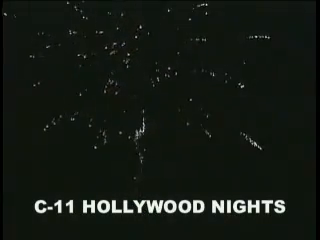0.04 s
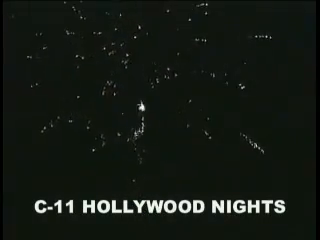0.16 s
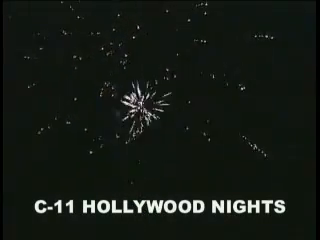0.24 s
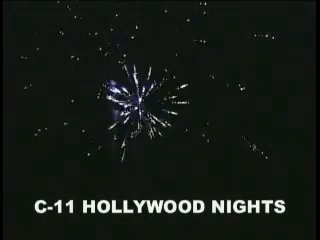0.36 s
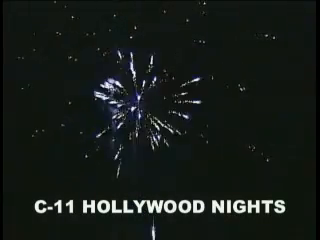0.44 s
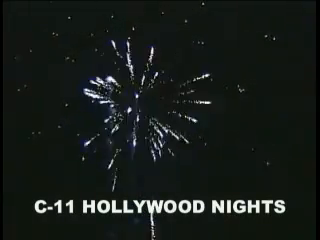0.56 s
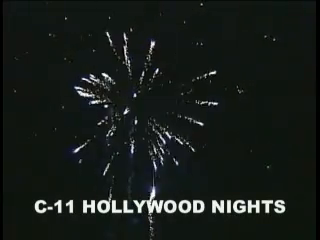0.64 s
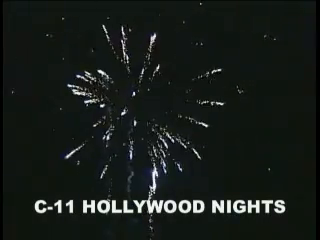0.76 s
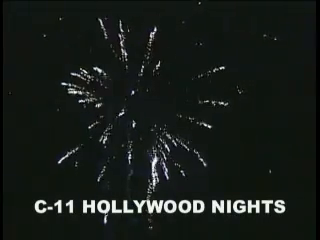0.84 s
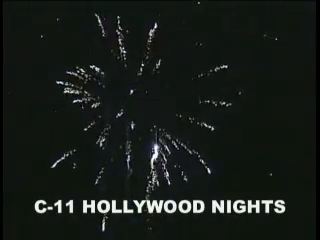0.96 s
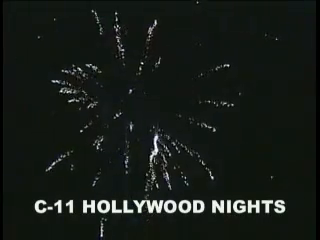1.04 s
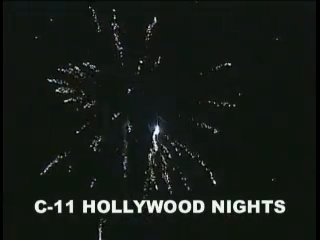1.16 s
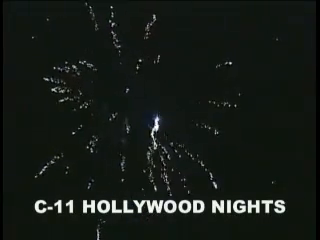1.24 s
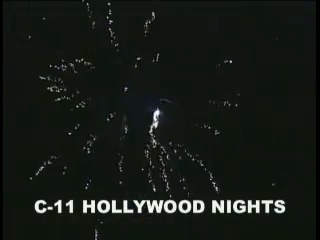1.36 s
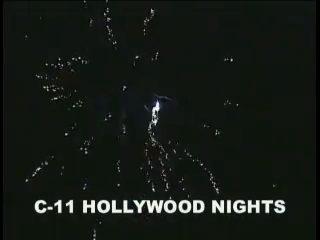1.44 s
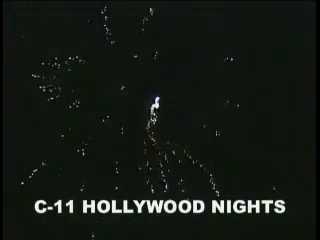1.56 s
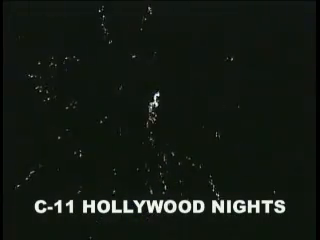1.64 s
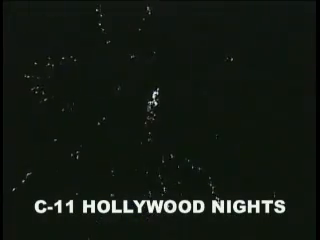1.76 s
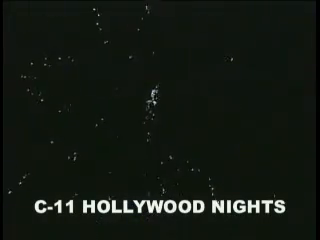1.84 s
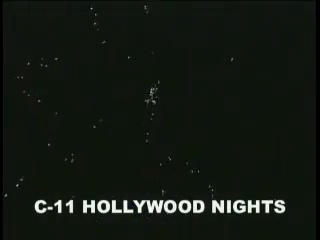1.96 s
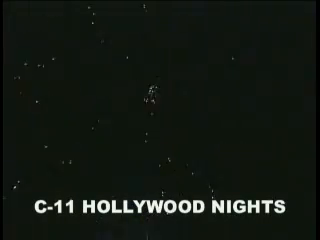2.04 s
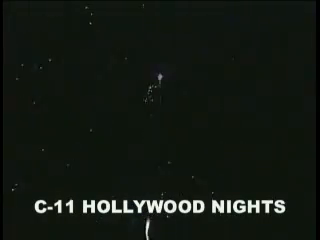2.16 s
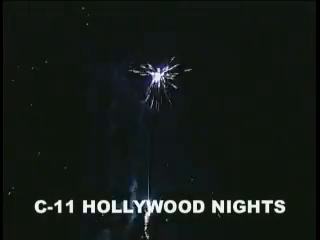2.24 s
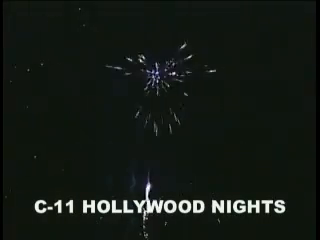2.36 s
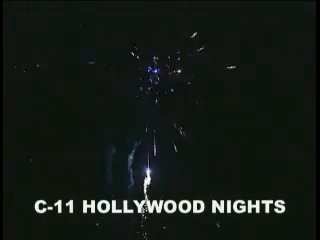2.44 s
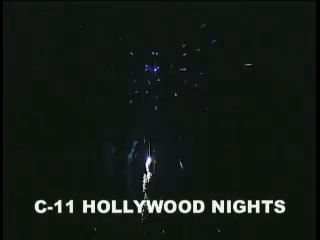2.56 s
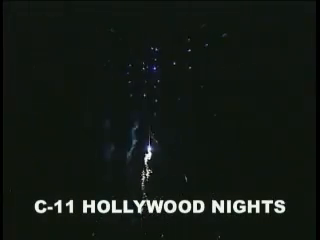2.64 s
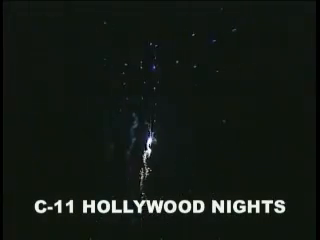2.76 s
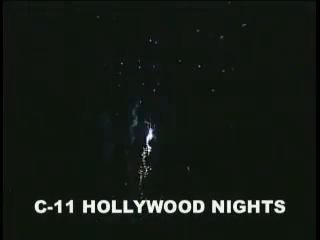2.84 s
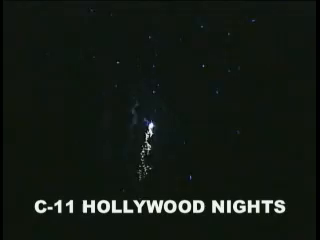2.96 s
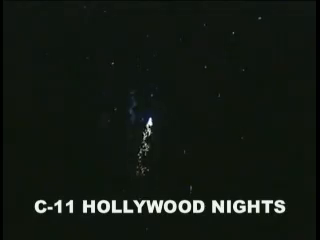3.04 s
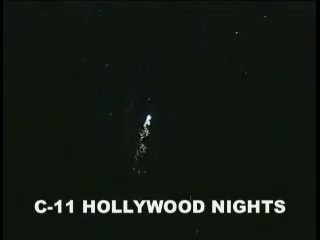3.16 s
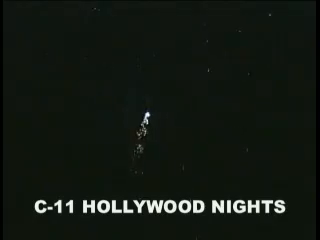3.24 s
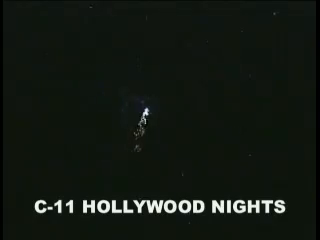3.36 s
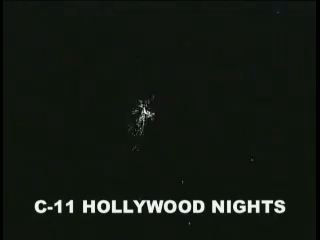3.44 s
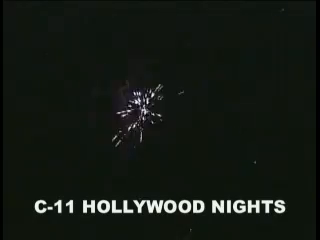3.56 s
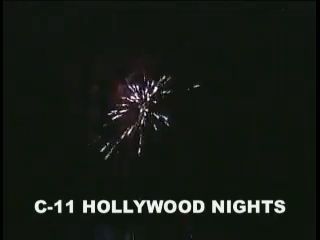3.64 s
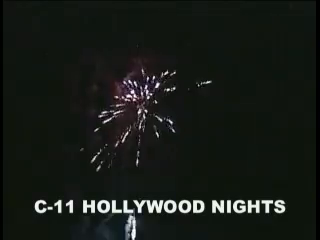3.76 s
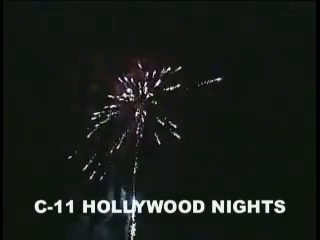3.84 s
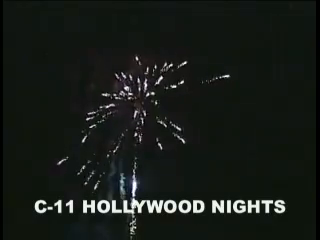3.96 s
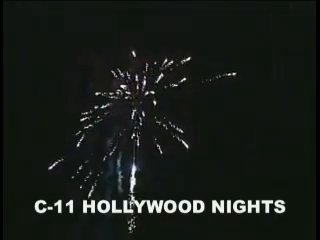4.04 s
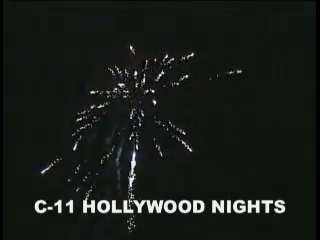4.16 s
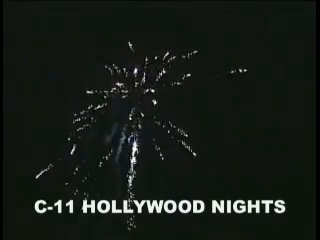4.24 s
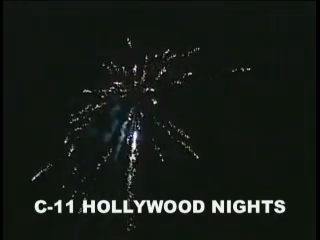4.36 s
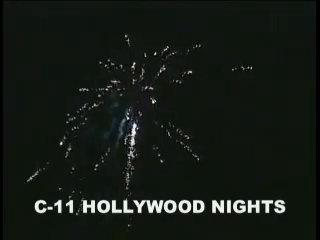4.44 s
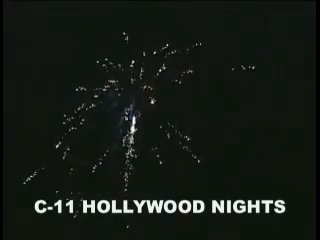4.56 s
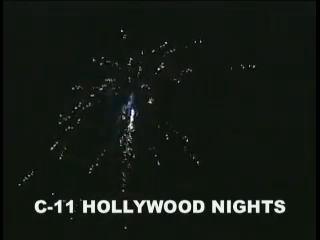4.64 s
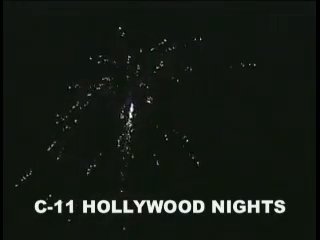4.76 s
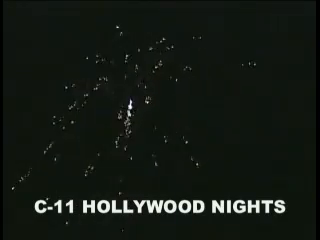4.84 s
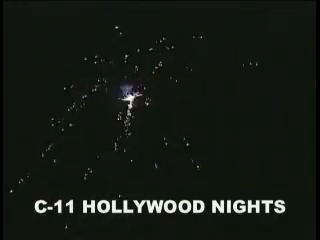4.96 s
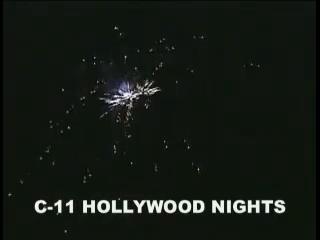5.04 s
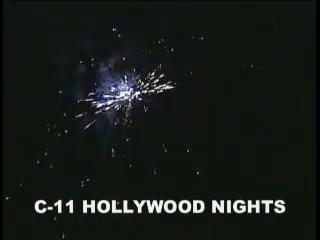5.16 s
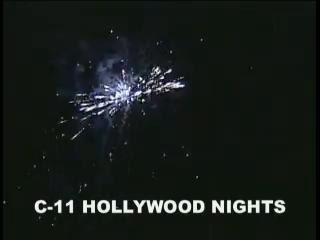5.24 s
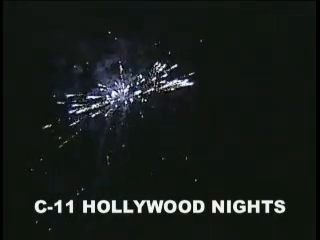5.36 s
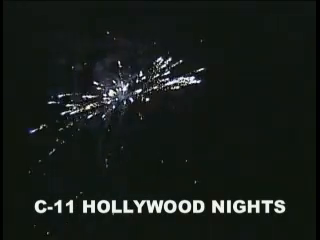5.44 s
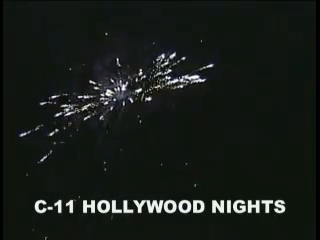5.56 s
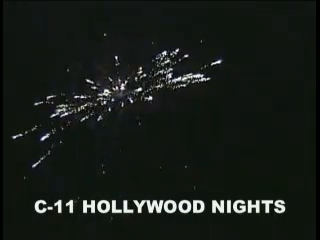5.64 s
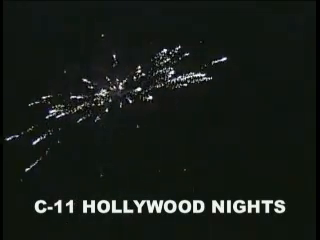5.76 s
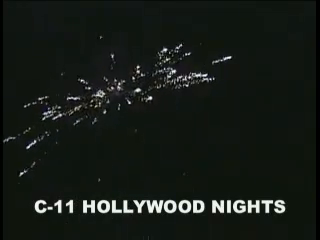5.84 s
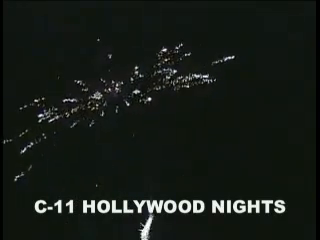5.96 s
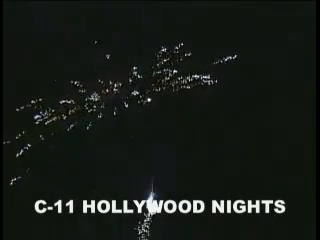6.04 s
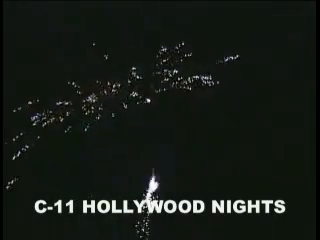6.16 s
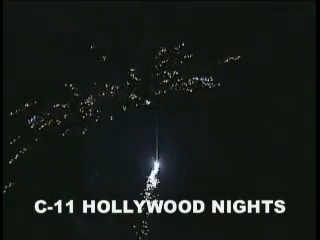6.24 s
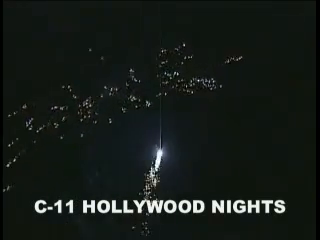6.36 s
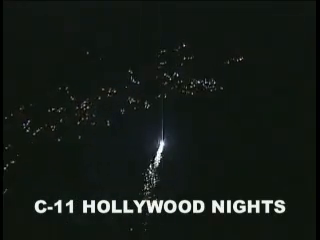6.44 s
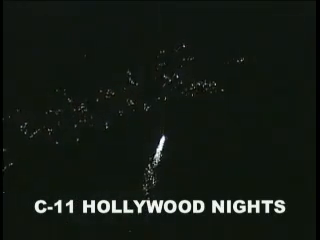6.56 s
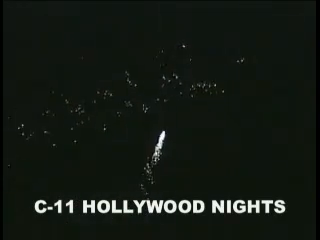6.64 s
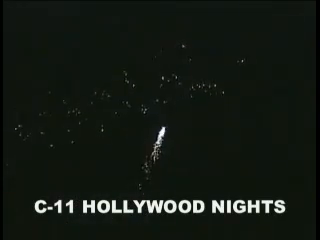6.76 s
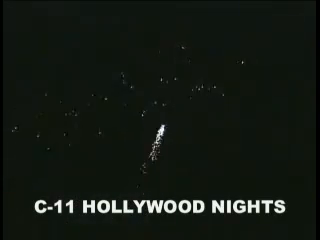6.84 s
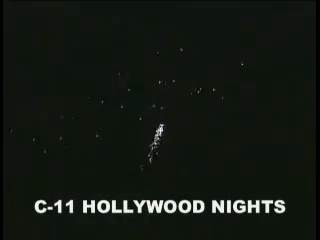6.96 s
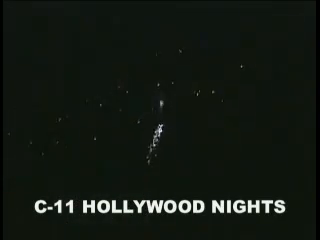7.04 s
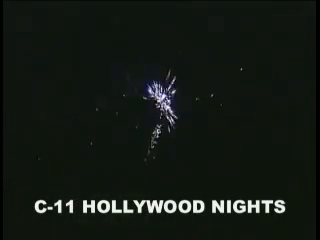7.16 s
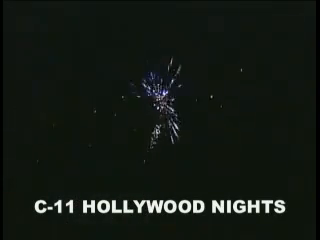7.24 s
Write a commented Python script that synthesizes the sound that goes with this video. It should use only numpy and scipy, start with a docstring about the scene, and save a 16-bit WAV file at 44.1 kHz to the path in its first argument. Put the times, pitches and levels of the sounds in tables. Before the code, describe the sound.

Aerial fireworks launch with dull thuds and burst in sharp, echoing cracks outdoors, one shot after another.

```python
"""A firework cake fires outdoors at night: shells thud out of their tubes and crack overhead.
Each shock is an N-shaped pressure jump that overloads the microphone, then scatters back from the
surroundings as a tail of noise. The bursts also bounce off the ground and roll away into the distance.
Burning stars fizz faintly over a steady bed of night air."""
import sys
import numpy as np
from scipy import signal
from scipy.fft import rfft, irfft
from scipy.io import wavfile

SR = 44100
rng = np.random.default_rng(int(sys.argv[2]) if len(sys.argv) > 2 else 0)


def dump_mix(stems):
    """Bounce the given channels to the path in sys.argv[1] as a 16-bit WAV at rate SR."""
    frames = np.atleast_2d(stems).T  # one column per channel
    limited = np.clip(frames, -1, 1)  # hard clip at full scale
    pcm = np.round(limited * 32767).astype(np.int16)
    wavfile.write(sys.argv[1], SR, pcm)


N = 321930
TIME = np.arange(N) / SR
AGE = TIME[:2 ** 16]   # seconds since a shot
HZ = np.maximum(np.fft.rfftfreq(N, 1 / SR), 1)
AGE_HZ = np.maximum(np.fft.rfftfreq(len(AGE), 1 / SR), 1)

# tone of the night air (frequency [Hz], relative level [dB])
AIR_SPECTRUM = [(25, -12), (60, -5), (200, -5.5), (330, -1), (450, -8), (830, 1), (1200, -6), (1700, -12.5),
                (2500, -12.5), (3300, -10.5), (4700, -35), (6000, -36), (8000, -46), (12500, -51)]
# swells of thin, high hiss (time [s], level [dB])
HISS_SWELLS = [(1.35, -49), (2.93, -55), (4.87, -53), (6.61, -47.5)]
# spits from burning stars (time [s], level [dB], half length [s])
STAR_SPITS = [(4.965, -66, .006), (6.0, -66, 0.029), (6.02, -67.5, 0.28), (6.145, -69, 0.028)]
# tone of their fizz (frequency [Hz], relative level [dB])
FIZZ_SPECTRUM = [(2500, -15), (5000, -2), (9500, -10), (13000, -27)]
# tone of the distant roll (frequency [Hz], relative level [dB])
ROLL_SPECTRUM = [(100, -15), (330, -11.5), (480, -3.5), (800, 2), (1150, 0), (1800, -7.5), (2600, -14),
                 (3700, -17.5), (4900, -35), (6500, -46.5), (9000, -66.5), (13000, -72)]

# shells leaving the tube; the first row is the fading tail of an earlier bang (time [s], echo gain [dB])
SHELL_LAUNCHES = [(-.1, -19), (1.5186, -16), (3.1509, -16.5), (5.3541, -21.5)]
# one shell sputters just before it lifts (time [s], level [dB], half length [s])
LIFT_SPUTTER = [(3.1490, -13.5, 0.0016)]
# tone of a launch's tail (frequency [Hz], relative level [dB])
LAUNCH_SPECTRUM = [(50, -25), (120, -4), (210, 2.5), (400, -5), (600, -3), (1000, -9), (1800, -11.5),
                   (2500, -15.5), (3550, -7.5), (4800, -23.5), (6500, -26), (9000, -35.5), (13000, -44.5),
                   (15500, -70)]
# decay of a launch's tail (frequency [Hz], t60 [s])
LAUNCH_DECAY = [(100, 0.63), (249, 0.62), (895, 1.28), (3370, 0.89), (10000, .67)]

# shells bursting overhead (time [s], echo gain [dB], centre of the echo's body [Hz])
SHELL_BURSTS = [(0.2603, -15.5, 1430), (2.2930, -14.5, 950), (3.4990, -16, 680), (5.0508, -16.5, 1000),
                (7.1519, -14, 1030)]
# tone of a burst's tail and of the sputter (frequency [Hz], relative level [dB])
BURST_SPECTRUM = [(50, -22), (120, -15.5), (230, -5), (400, -5), (650, -0.34), (1100, -3.5), (1700, -8),
                  (2500, -10.5), (3600, -10), (4800, -24), (6500, -27), (9000, -35), (13000, -46),
                  (15500, -70)]
# decay of a burst's tail (frequency [Hz], t60 [s])
BURST_DECAY = [(100, .76), (304, 0.93), (1100, 1.206), (3460, 1.2), (10000, 0.87)]
# two broad surfaces nearby throw each burst back as a swell in its tail (delay [s], boost [dB])
SLAPBACKS = [(.029, 2.5), (.079, 2)]


def from_db(db):
    """Decibels to gain."""
    return 10 ** (np.asarray(db) / 20)


def unit_rms(x):
    """Scale to rms 1."""
    return x / np.sqrt(np.mean(x ** 2) + 1e-20)


def eq_curve(spectrum, hz):
    """Gains of a spectrum table, read on a log-frequency axis."""
    points_hz, db = np.transpose(spectrum)
    return from_db(np.interp(np.log(hz), np.log(points_hz), db))


def cut(x, hz, kind, order=2):
    """Causal low- or high-pass."""
    return signal.sosfilt(signal.butter(order, hz, kind, fs=SR, output="sos"), x + 1e-18)


def ring(x, hz, width_hz):
    """A resonance with gain 1 at its peak."""
    return signal.lfilter(*signal.iirpeak(hz, hz / width_hz, fs=SR), x + 1e-18)


def place(out, sound, start_s):
    """Mix a one-shot in at its start time."""
    out += np.interp(TIME - start_s, AGE, sound, left=0, right=0)


def drift(rate_hz, t):
    """A random modulator gliding between values of spread 1."""
    return np.interp(t * rate_hz, np.arange(2 ** 13), rng.standard_normal(2 ** 13))


def swells(rows):
    """An envelope of bell-shaped rises and falls."""
    return sum(from_db(db) * np.exp(-((TIME - s) / half_s) ** 2) for s, db, half_s in rows)


def noise(spectrum):
    """Steady shaped noise with a soft top, rms 1."""
    shaped = irfft(rfft(rng.standard_normal(N)) * eq_curve(spectrum, HZ), N)
    return unit_rms(cut(shaped, 12600, "low", order=8))


def noise_band(hz, half_width_hz):
    """A narrow band of noise, rms 1."""
    return unit_rms(cut(rng.standard_normal(N), half_width_hz, "low") * np.cos(2 * np.pi * hz * TIME))


def night_air():
    """The bed: a steady wash, a faint hollow note and a thin hiss that wavers and swells."""
    wash = from_db(-40.5) * noise(AIR_SPECTRUM)
    hollow = from_db(-51.5) * noise_band(hz=857, half_width_hz=32)
    hiss = from_db(-55 + 3.6 * drift(12, TIME)) * noise_band(hz=2950, half_width_hz=140)
    upper_envelope = swells((s, db, 0.068) for s, db in HISS_SWELLS)
    return wash + hollow + hiss + upper_envelope * noise_band(hz=3430, half_width_hz=170)


def burning_stars():
    """Burning stars spit short, grainy puffs of fizz."""
    return swells(STAR_SPITS) * noise(FIZZ_SPECTRUM) * from_db(2.7 * drift(800, TIME))


def distant_roll(level_db, build_s, t60, slope_delay_s, slope_half_s, slope_db):
    """Each burst rolls on far away and swells once more as a distant slope answers."""
    power = np.zeros(N)
    for start_s, echo_db, _ in SHELL_BURSTS:
        age = np.maximum(TIME - start_s, 0)
        roll = (1 - np.exp(-age / build_s)) * from_db(level_db - 60 * age / t60)
        answer = from_db(slope_db) * np.exp(-((age - slope_delay_s) / slope_half_s) ** 2)
        power += from_db(echo_db) ** 2 * (roll ** 2 + answer ** 2)
    return np.sqrt(power) * noise(ROLL_SPECTRUM) * from_db(0.99 * drift(25, TIME))


def scatterers(clump_db, wave_db):
    """The spectrum of countless small echoes, arriving in quick clumps and slower waves."""
    echoes = rng.standard_normal(len(AGE))
    return rfft(echoes * from_db(clump_db * drift(700, AGE) + wave_db * drift(59.5, AGE)))


def scatter_tail(echoes, spectrum, decay, build_s, near_share, steepness, hold_share):
    """Near things answer at once; the rest builds up, holds, then dies away band by band."""
    shaped = echoes * eq_curve(spectrum, AGE_HZ)
    bands_hz, t60s = np.transpose(decay)
    attack = 1 - (1 - near_share) * np.exp(-(AGE / build_s) ** steepness)
    tail = 0
    for t60, solo in zip(t60s, np.eye(len(bands_hz))):
        band = irfft(shaped * np.interp(np.log(AGE_HZ), np.log(bands_hz), solo))
        hold_s = hold_share * t60   # long-lived bands also hold longer
        fading_s = np.hypot(AGE, hold_s) - hold_s
        tail += band * from_db(-60 * fading_s / t60)
    return attack * tail / np.std(irfft(shaped))


def shock(length_ms, lowpass_hz, highpass_hz):
    """An N-shaped pressure jump, rounded by the air and thinned by the microphone."""
    n_wave = np.interp(AGE * 1000 / length_ms, [0, .08, .9, 1], [0, 1, -1, 0])
    rounded = cut(n_wave, lowpass_hz, "low", order=1)
    return cut(rounded, highpass_hz, "high", order=1)


def sub_thump(hz, t60, level_db):
    """A deep, brief thump as the overloaded microphone recovers from each shock."""
    return -np.sin(2 * np.pi * hz * AGE) * from_db(level_db - 60 * AGE / t60)


def echo_run(count, first_s, gap_s, gap_growth, jitter_s, gain_db):
    """Things on the ground return a launch as quick, raspy echoes that spread out and weaken."""
    echo = shock(length_ms=1.52, lowpass_hz=520, highpass_hz=90)
    echo = cut(cut(echo, 3800, "low", order=4), 170, "high")
    echo += 7.5 * ring(echo, hz=3620, width_hz=180)   # the rasp
    gaps = gap_s * gap_growth ** np.arange(count) + jitter_s * rng.standard_normal(count)
    delays = first_s + np.cumsum(gaps) - gaps
    gains = from_db(gain_db - 10 * np.log2(delays / first_s))   # 10 dB down per doubling of the delay
    return sum(gain * np.interp(AGE - delay, AGE, echo, left=0) for delay, gain in zip(delays, gains))


def launches(drive_db):
    """Shells thud out of tubes that stand on one spot, so every launch wakes the same echoes."""
    out = swells(LIFT_SPUTTER) * noise(BURST_SPECTRUM)
    thud = shock(length_ms=1.19, lowpass_hz=950, highpass_hz=80)
    thud += 0.075 * ring(thud, hz=400, width_hz=97)
    sub = sub_thump(hz=30, t60=0.091, level_db=-15.5)
    echoes = scatterers(clump_db=1.0, wave_db=1.8)
    tail = scatter_tail(echoes, LAUNCH_SPECTRUM, LAUNCH_DECAY,
                        build_s=0.023, near_share=0.27, steepness=6.2, hold_share=0.066)
    tail += echo_run(count=18, first_s=.026, gap_s=.0037, gap_growth=1.0306, jitter_s=.00056, gain_db=14.5)
    for start_s, echo_db in SHELL_LAUNCHES:
        place(out, from_db(drive_db) * thud + sub + from_db(echo_db) * tail, start_s)
    return out


def bursts(drive_db, bounce_drive_db, bounce_delay_s, slap_half_s):
    """A crack from above, its duller bounce off the ground, and fresh echoes for each spot in the sky."""
    out = np.zeros(N)
    crack = shock(length_ms=0.85, lowpass_hz=2140, highpass_hz=270)
    crack += 0.16 * ring(crack, hz=790, width_hz=120)
    bounce = cut(shock(length_ms=0.78, lowpass_hz=686, highpass_hz=200), 3400, "low")
    sub = sub_thump(hz=30.4, t60=0.045, level_db=-11.5)
    slap_db = sum(db * np.exp(-((AGE - delay) / slap_half_s) ** 2) for delay, db in SLAPBACKS) - 0.48
    for start_s, echo_db, body_hz in SHELL_BURSTS:
        body_db = 3 * np.exp(-np.log2(AGE_HZ / body_hz) ** 2)   # each charge has its own broad peak
        echoes = scatterers(clump_db=1.5, wave_db=0.8) * from_db(body_db)
        tail = scatter_tail(echoes, BURST_SPECTRUM, BURST_DECAY,
                            build_s=0.0084, near_share=0.58, steepness=3.0, hold_share=0.14)
        place(out, from_db(drive_db) * crack + sub + from_db(echo_db + slap_db) * tail, start_s)
        place(out, from_db(bounce_drive_db) * bounce, start_s + bounce_delay_s)
    return out


def scene():
    """The mono mix, with the shocks driven far past what the microphone can take."""
    roll = distant_roll(level_db=-13, build_s=0.37, t60=5.9,
                        slope_delay_s=1.0, slope_half_s=0.18, slope_db=-23.5)
    thuds = launches(drive_db=12)
    cracks = bursts(drive_db=11, bounce_drive_db=14.5, bounce_delay_s=.0084, slap_half_s=.0074)
    return (thuds + cracks + roll + burning_stars() + night_air())[None]


def limiter(x, threshold_db, attack_hz, release_db_per_s):
    """Too slow to catch a shock, it ducks whatever follows and then recovers."""
    over_db = np.maximum(20 * np.log10(np.abs(x) + 1e-9) - threshold_db, 0)
    release_db = release_db_per_s * TIME
    duck_db = np.maximum.accumulate(over_db + release_db, axis=-1) - release_db
    return x * from_db(-cut(duck_db, attack_hz, "low", order=1))


def record(dry):
    """The limiter ducks, the shocks clip flat and the top end is cut."""
    ducked = limiter(dry, threshold_db=0, attack_hz=59, release_db_per_s=248)
    ceiling = .64
    clipped = ducked / (1 + (ducked / ceiling) ** 8) ** (1 / 8)
    return cut(clipped, 16000, "low", order=16)


dry = scene()
out = record(dry)
dump_mix(out)
```